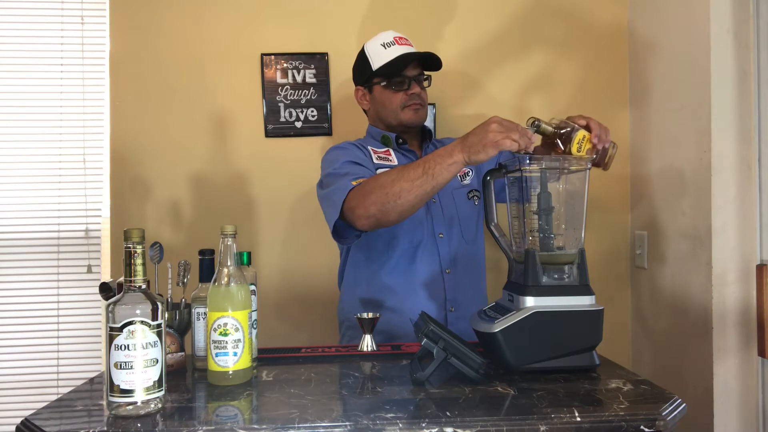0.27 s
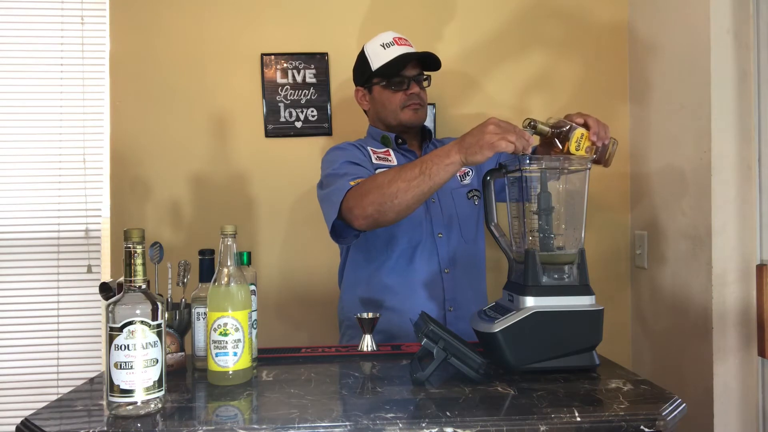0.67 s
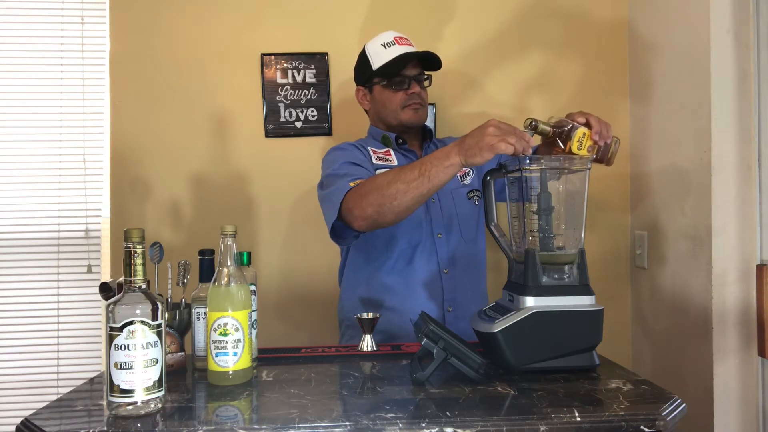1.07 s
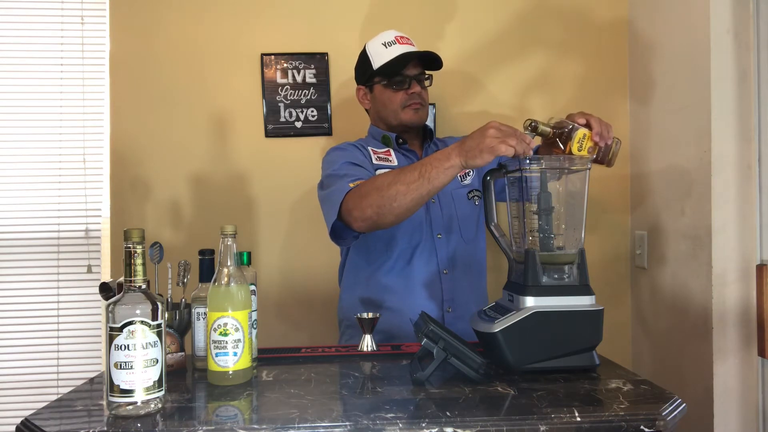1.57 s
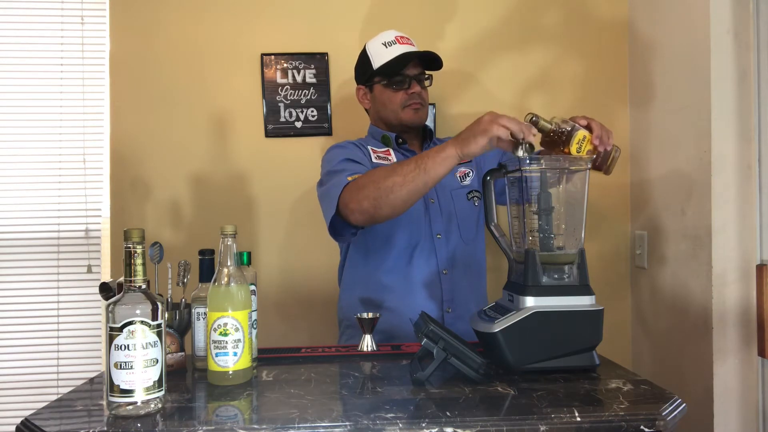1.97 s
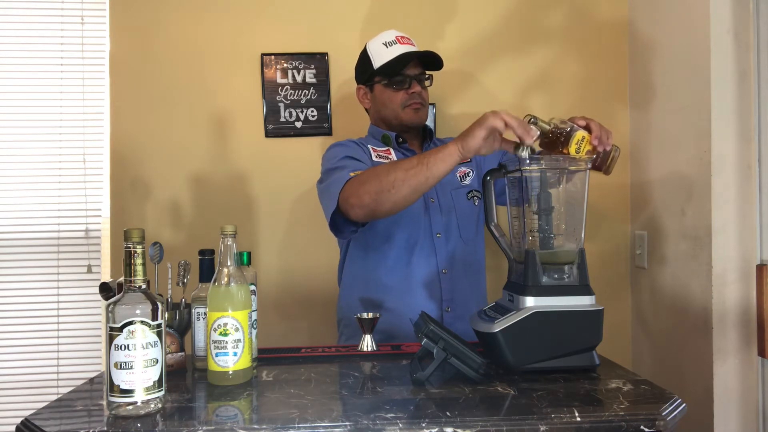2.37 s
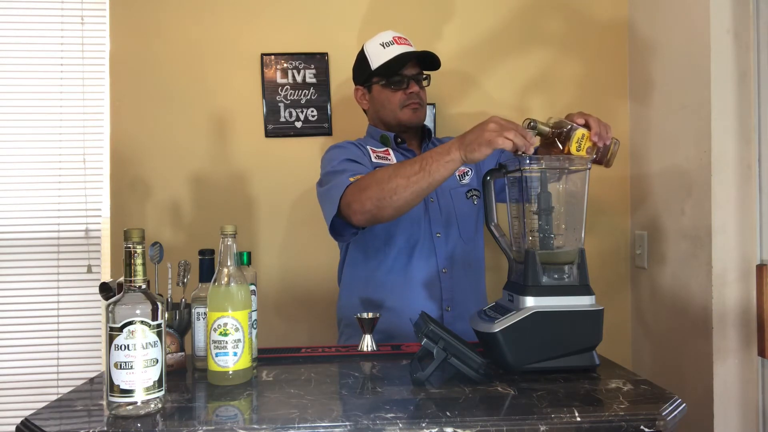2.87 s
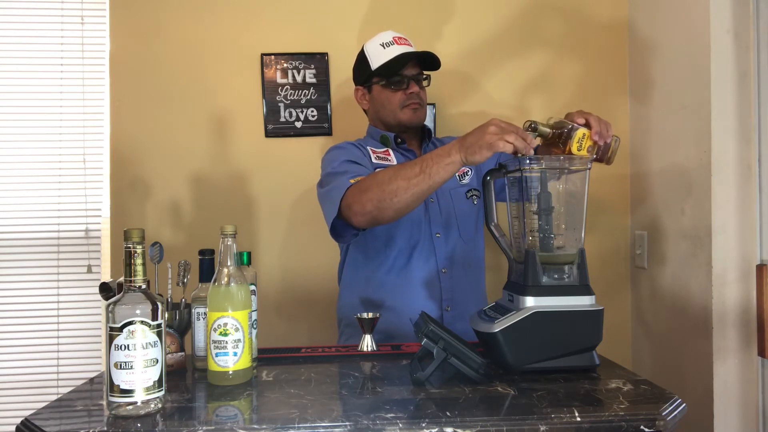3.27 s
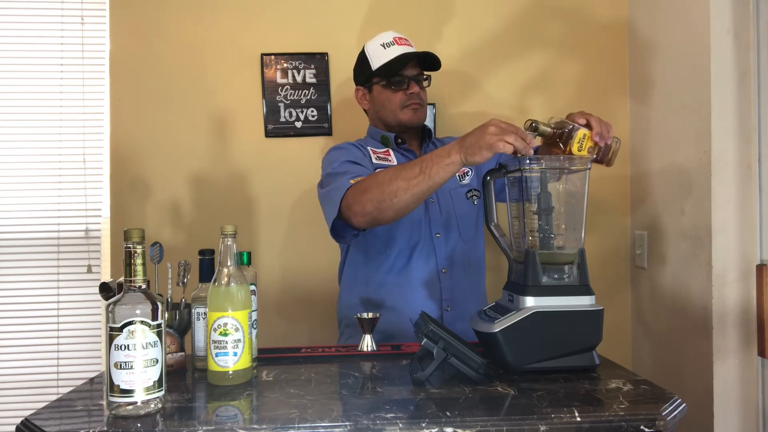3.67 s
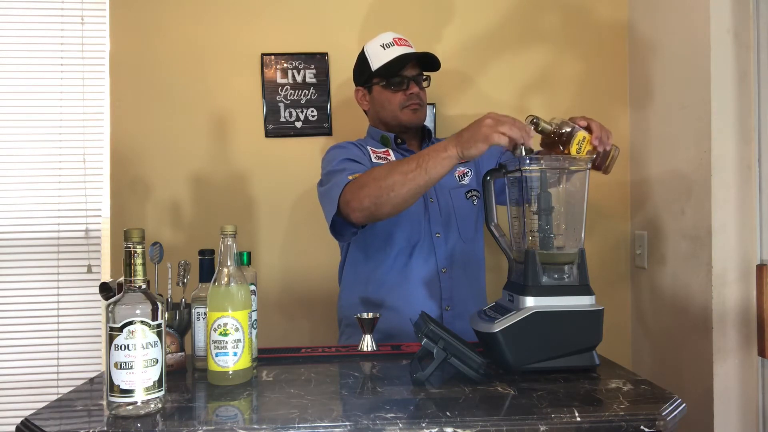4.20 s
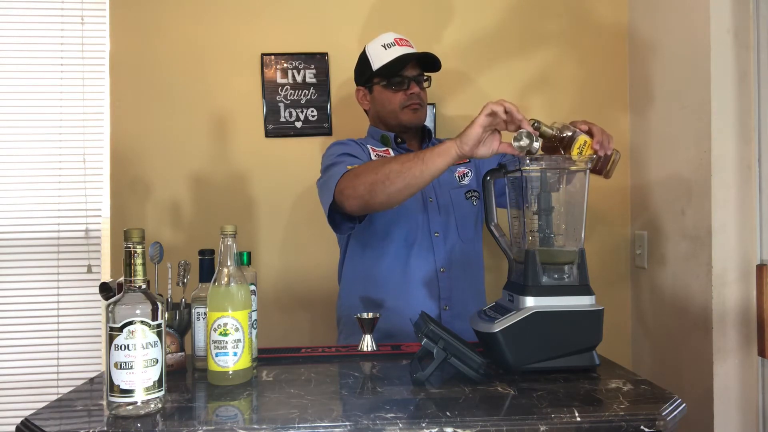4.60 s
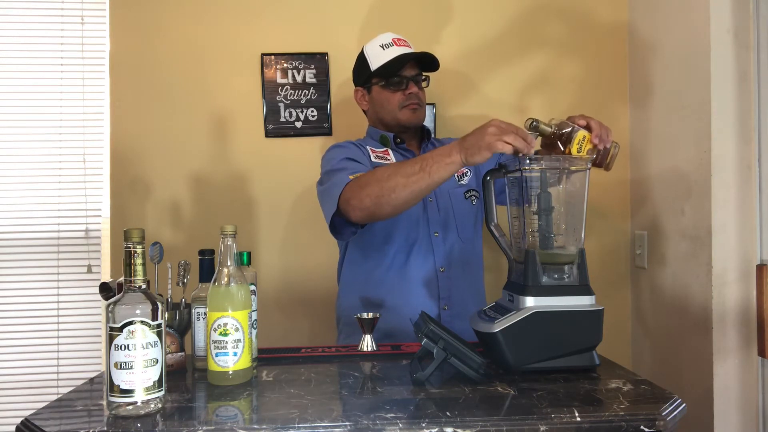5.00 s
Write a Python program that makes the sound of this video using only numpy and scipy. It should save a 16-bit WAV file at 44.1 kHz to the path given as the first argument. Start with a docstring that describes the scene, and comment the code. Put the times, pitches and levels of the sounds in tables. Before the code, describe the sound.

Liquid trickles from a bottle into a small metal measure and is twice tipped splashing into a blender jar, over a low hum.

```python
"""In a small room, over the hum and throb of household machines, spirit trickles from a bottle's spout
into a small metal measure held over a blender jar. Impacts excite the measure's resonances, trapped
bubbles ring and droplets spit. At 2.2 s the measure is tipped: the shot splashes into the jar, churns
up bubbles and sets the air column booming; then the measure knocks. The trickle goes on. At 4.5 s a
knock and a second shot come together, and a last knock follows at 5.1 s."""
import sys
import numpy as np
from scipy import signal
from scipy.fft import rfft, irfft
from scipy.io import wavfile
from scipy.ndimage import uniform_filter1d, map_coordinates

SR = 44100
rng = np.random.default_rng(int(sys.argv[2]) if len(sys.argv) > 2 else 0)


def store_wav(level_fs):
    """Save 16-bit WAV to argv[1]."""
    pcm = np.round(np.clip(np.atleast_2d(level_fs), -1, 1) * 32767)
    wavfile.write(sys.argv[1], SR, pcm.T.astype(np.int16))


N = 231392
T = np.arange(N) / SR

# The tipped shots: start t/s, lead of the first drops/s, emptying time/s, relative splash level/dB,
# sag/(dB/s), boom delay/s, relative boom level/dB, boom f/Hz
SHOTS = [(2.218, .05, 0.35, -45.5, 26, .16, -51, 403.2), (4.484, .008, 0.28, -46, 11.5, .35, -50.5, 427)]


def undb(db):
    """Amplitude ratio for a level in decibels."""
    return 10 ** (np.asarray(db) / 20)


def unit(x):
    """Normalisation to an rms of 1."""
    return x / np.sqrt(np.mean(x ** 2))


def add(out, start_s, sound):
    """Superposition: mix a sound in from the given time."""
    i = max(int(start_s * SR), 0)
    out[i:i + len(sound)] += sound[:max(N - i, 0)]


def walk(rate):
    """Smooth random modulation of spread near 1, changing rate times a second."""
    step = int(SR / rate)
    held = np.repeat(rng.standard_normal(N // step + 1), step)
    return 1.3 * uniform_filter1d(held, step)[:N]


def colour(x, points):
    """Minimum-phase filter through points (f/Hz, gain/dB)."""
    hz, db = np.transpose(points)
    f = np.maximum(np.arange(N + 1) * SR / (2 * N), 1)
    cepstrum = irfft(np.log(undb(np.interp(np.log(f), np.log(hz), db))))
    cepstrum[1:N] *= 2  # folding onto positive time makes the filter causal
    cepstrum[N + 1:] = 0
    return irfft(rfft(x, 2 * N) * np.exp(rfft(cepstrum)))[:N]


def resonance(x, hz, width_hz):
    """Second-order resonator with gain 1 at its centre."""
    quality = hz / min(width_hz, SR / 4)
    return signal.lfilter(*signal.iirpeak(min(hz, SR / 2 - 1), quality, fs=SR), x)


def vessel(x, modes):
    """Forced vibration: the driving sound plus the modes that it excites."""
    return x + sum(undb(db) * resonance(x, hz, width) for hz, width, db in modes)


def machines():
    """Fans and compressor give a wavering line spectrum whose close tones beat, over broadband noise."""
    # Tones of fans and compressor: f/Hz, relative level/dB
    tones = [(18.7, -37.9), (23.3, -40.3), (53.8, -57.4), (58.5, -60.7), (113.9, -67), (119.9, -68),
             (161.5, -72.7), (192.3, -64.8), (227.9, -57.8), (233.8, -68.3), (239.9, -65), (270, -75),
             (292.2, -61.9), (335.7, -74.5), (473.7, -71), (525.9, -72.9), (552.6, -83), (584.3, -81.6)]
    # Spectra of their rumble and of moving air: f/Hz, spectral density level/dB
    rumble_spectrum = [(3, -54), (12, -50.5), (20, -61.5), (30, -66.5), (40, -60.5), (58, -69), (72, -77.5),
                       (88, -99), (150, -125)]
    air_spectrum = [(60, -112), (100, -79.5), (200, -84), (330, -79), (375, -85), (405, -84.5),
                    (470, -85.5), (540, -95), (660, -94), (860, -92), (1250, -98.5), (1600, -104),
                    (4000, -112), (15000, -117)]
    hum = np.zeros(N)
    for hz, db in tones:
        amplitude = np.sqrt(2) * undb(db + .9 * walk(3))
        hum += amplitude * np.sin(2 * np.pi * (hz * T + rng.random()) + .25 * walk(3))
    rumble = colour(rng.standard_normal(N) * np.sqrt(SR / 2), rumble_spectrum)
    air = colour(rng.standard_normal(N) * np.sqrt(SR / 2), air_spectrum)
    return undb(.5) * hum + rumble + air * undb(.5 * walk(5.57))


def stream():
    """Amplitude envelope of the spout's flow: steady, with brief surges, a little louder during shots."""
    # Surges of the stream: t/s, relative level/dB
    surges = [(.02, -56), (.45, -72), (1.0, -61.5), (1.38, -61.5), (1.67, -63.5), (3.97, -71), (4.28, -69),
              (5.19, -63)]
    rise_s, fall_s = .046, .019
    surging = sum(undb(db) * np.exp(-np.maximum((s - T) / rise_s, (T - s) / fall_s)) for s, db in surges)
    tipped = sum((T > s) & (T < s + empty_s + .2) for s, _, empty_s, *_ in SHOTS)
    return undb(-66 + 2.5 * uniform_filter1d(tipped * 1., size=2048)) + surging


def impacts(rate, spread_db, decay_s):
    """Poisson process of droplet impacts, most tiny and a few large, each a decaying puff of noise."""
    chance, size, spray = rng.random(N), rng.exponential(size=N), rng.standard_normal(N)
    hits = (chance < rate / SR) * undb(spread_db * np.minimum(size, 4)) ** 2
    energy = signal.lfilter([1], [1, -np.exp(-2 / (decay_s * SR))], hits + 1e-12)
    return spray * np.sqrt(energy)


def scatter(x, t60, wet_db, size):
    """Diffuse reflection off walls and heaving liquid: each band's energy lingers as decaying noise."""
    frames = dict(nperseg=size, noverlap=size - size // 4)
    sound = signal.stft(x, **frames)[2]
    noise = signal.stft(rng.standard_normal(N), **frames)[2]
    retained = 1e-6 ** (size / 4 / SR / t60)  # share of energy left after each hop
    energy = signal.lfilter([0, 0, 1 - retained], [1, -retained], np.abs(sound) ** 2 + 1e-30)
    echoes = signal.istft(np.sqrt(energy) * noise / np.std(noise), **frames)[1]
    return x + undb(wet_db) * echoes[:N]


def wander(x, depth_db, patch_s, patch_hz):
    """Spectral modulation: the stream strikes ever new spots, so patches of spectrum flare and fade."""
    hz, s, sound = signal.stft(x, SR, nperseg=256)
    place = np.meshgrid(hz / patch_hz, s / patch_s, indexing="ij")
    field = map_coordinates(rng.uniform(-1, 1, (64, 512)), place, order=1)
    return signal.istft(sound * undb(depth_db * field))[1][:N]


def bubble(hz, cycles, rise):
    """Trapped air rings as a damped oscillator whose pitch climbs as it nears the surface."""
    age = np.arange(int(cycles / hz * SR)) * hz / SR / cycles  # 0 to 1 over a decay of 60 dB
    onset = 1 - np.exp(-age * cycles / 1.48)
    phase = 2 * np.pi * cycles * (age + rise * age ** 2 / 2)
    return onset * 1000 ** -age * np.sin(phase)


def froth(flow, low_hz, high_hz, cycles, rise, spread_db, count):
    """Air entrainment: bubbles of random size sum incoherently, as loud as the flow that makes them."""
    out, wet_times = np.zeros(N), T[flow > 1e-6]
    for when, size, life, strength in rng.random((count, 4)):
        ring = bubble(low_hz * (high_hz / low_hz) ** size, cycles * (.5 + life), rise)
        add(out, wet_times[int(when * len(wet_times))], undb(spread_db * strength) * ring)
    return unit(out) * np.sqrt(len(wet_times) / N) * flow


def trickle():
    """Impact excitation: the thin stream patters on the measure, drives its modes and fizzes."""
    # Spectrum of the spray: f/Hz, relative level/dB
    spectrum = [(300, 16.5), (1000, -0.5), (2000, -2), (4000, -4.5), (6000, -2.5), (10000, -4),
                (13000, -5.5), (16000, -42)]
    # Resonances of the measure: f/Hz, bandwidth/Hz, gain/dB
    measure_modes = [(1710, 30, 11), (1748, 87, 13), (2260, 23, -9), (2480, 39, -5), (2656, 90, 10),
                     (2888, 68, 5.5), (3030, 59, -3), (3410, 74, 9.5), (5080, 68, 2), (5760, 720, -14.5)]
    flow = stream()
    patter = scatter(impacts(rate=320, spread_db=5, decay_s=.0018), t60=.059, wet_db=2, size=128)
    patter = wander(patter, depth_db=7, patch_s=.03, patch_hz=1200)
    patter *= undb(2.2 * np.tanh(walk(25)))  # the level flutters
    patter = unit(vessel(colour(patter, spectrum), measure_modes))
    fizz = froth(flow, low_hz=1997, high_hz=13100, cycles=112, rise=.12, spread_db=20, count=1400)
    return undb(1) * flow * patter + undb(-8) * fizz


def drops(start, length_s, per_s, db, spread_db, low_hz, high_hz):
    """Jittered train of up to 64 chance events, as rows (t/s, level/dB, f/Hz)."""
    rows = []
    for k, (when, strength, size) in enumerate(rng.random((64, 3))):
        s = start + (k + when) / per_s
        if s < start + length_s:
            rows.append((s, db + spread_db * (2 * strength - 1), low_hz * (high_hz / low_hz) ** size))
    return rows


def plops():
    """Bubble resonance: the larger bubbles ring one by one, with the jar's short echo."""
    # The loudest single bubbles: t/s, relative level/dB, f/Hz
    loudest = [(.048, -40, 2140), (.171, -49.5, 2600), (.573, -47, 2170), (1.184, -43.5, 1810),
               (1.689, -39.5, 1600), (1.724, -42.5, 2860), (1.761, -41.5, 1880), (2.213, -33.5, 3720),
               (2.218, -36.5, 1206), (2.246, -35, 2340), (2.398, -37, 2320), (2.406, -35, 1094),
               (2.467, -30.5, 4600), (2.487, -34.5, 1113), (2.525, -34.5, 1720), (2.959, -50, 2260),
               (3.314, -46, 2840), (4.345, -47, 770), (4.507, -38.5, 990), (4.589, -33, 1180),
               (4.618, -34, 1200), (4.763, -30, 1190), (4.821, -36, 1110), (4.856, -39, 1040),
               (5.139, -40, 1720)]
    # Lesser ones come by chance: plinks in the measure, deeper glugs in the jar during a shot.
    plinks = drops(0, N / SR, per_s=6, db=-55.5, spread_db=5, low_hz=1530, high_hz=2300)
    glugs = []
    for start, _, empty_s, *_ in SHOTS:
        glugs += drops(start, empty_s, per_s=35, db=-44.5, spread_db=5.5, low_hz=847, high_hz=2100)
    out = np.zeros(N)
    for s, db, hz in list(loudest) + plinks + glugs:
        add(out, s, undb(db) * bubble(hz, cycles=39.7, rise=.14))
    return undb(-1.5) * scatter(out, t60=.054, wet_db=2, size=256)


def spits():
    """Band-limited transients: a droplet bursts with a bright tick and a short shower of finer ones."""
    # The loudest droplets against the walls: t/s, relative level/dB, centre f/Hz
    loudest = [(.2267, -52.5, 9900), (.964, -50.5, 9600), (1.1183, -50, 9700), (1.6222, -53, 9500),
               (1.8423, -54, 8860), (2.1622, -43.5, 10800), (2.2224, -36.5, 4210), (2.265, -36, 7500),
               (2.3156, -38.5, 9500), (2.632, -47, 4460), (2.7955, -48.5, 8800), (3.254, -46, 9450),
               (3.9813, -54.5, 8090), (4.272, -51, 5570), (4.625, -35, 3320), (4.645, -39, 5100),
               (5.201, -48, 4960)]
    faint = drops(0, N / SR, per_s=13, db=-56, spread_db=5, low_hz=6100, high_hz=15100)
    attack_s, tick_s, shower_s = .0015, .0024, .015
    out, t = np.zeros(N), T[:SR // 8]
    shape = (1 - np.exp(-t / attack_s)) * (np.exp(-t / tick_s) + undb(-11) * np.exp(-t / shower_s))
    for s, db, hz in list(loudest) + faint:
        burst = rng.standard_normal(len(t)) * shape
        tick = resonance(resonance(burst, hz, width_hz=4000), hz, width_hz=4000)
        add(out, s, undb(db) * tick / np.abs(tick).max())
    return undb(2.5) * out


def gush(start, lead_s, empty_s, db, sag_db_per_s):
    """Amplitude envelope of a shot: first drops, a sudden landing, a sag while emptying, a dribble."""
    attack_s, dribble_s, drain_db_per_s = .0087, .5, 130.5
    landing, end = start - attack_s, start + empty_s
    lead_db, end_db = db - 8.5, db - sag_db_per_s * empty_s
    times = [landing - lead_s, landing, start, end, end + dribble_s]
    levels = [lead_db, lead_db, db, end_db, end_db - drain_db_per_s * dribble_s]
    return undb(np.interp(T, times, levels, left=-200, right=-200))


def shot(start, lead_s, empty_s, db, sag_db_per_s, boom_delay_s, boom_db, boom_hz):
    """Dense impacts of a tipped shot excite the jar's modes; bubbles churn and the air column booms."""
    # Spectrum of the splash: f/Hz, relative level/dB
    spectrum = [(200, -41), (450, 2.5), (720, 2), (1100, -13.5), (2000, -0.5), (4000, 3.5), (6300, 3),
                (9000, 5.5), (12000, 2), (16000, -6)]
    # Resonances of the jar: f/Hz, bandwidth/Hz, gain/dB
    jar_modes = [(1083, 45, -19), (1210, 68, 19), (1570, 51, -27), (1813, 65, 8.5), (2264, 16, 23),
                 (2544, 42, 5.5), (2620, 47, 0), (3180, 370, -0.5), (4210, 40, 1), (4600, 100, -9),
                 (6000, 68, -21), (8200, 46, -34)]
    flow = gush(start, lead_s, empty_s, db, sag_db_per_s)
    splash = impacts(rate=1500, spread_db=3.5, decay_s=.001)
    splash = wander(splash, depth_db=8.5, patch_s=.026, patch_hz=1700)
    splash = unit(vessel(colour(splash, spectrum), jar_modes))
    churn = froth(flow, low_hz=995, high_hz=10970, cycles=58, rise=.18, spread_db=10, count=500)
    boom = air_column(start + boom_delay_s, boom_hz)
    return undb(-1) * flow * splash + undb(-8) * churn + undb(boom_db - 3.5) * boom


def air_column(peak_s, hz):
    """Cavity resonance: driven at random, the jar's air sounds a narrow band, rising with the liquid."""
    swell_db_per_s, hold_s, fade_db_per_s, rise_hz_per_s = 87, .081, 160, 110
    phase = 2 * np.pi * np.cumsum(hz + rise_hz_per_s * (T - peak_s)) / SR
    band = walk(80) * np.sin(phase) + walk(80) * np.cos(phase)
    before_s = np.maximum(peak_s - hold_s / 2 - T, 0)
    after_s = np.maximum(T - peak_s - hold_s / 2, 0)
    return band * undb(-swell_db_per_s * before_s - fade_db_per_s * after_s)


def knocks():
    """Damped free vibration: the hand-held measure touches spout or rim, cracks softly and rings."""
    # Touches of the measure: t/s, relative level/dB
    touches = [(2.578, -41), (4.482, -30), (5.099, -40)]
    # Its hand-damped modes: f/Hz, relative level/dB, t60/s
    modes = [(2185, -4.5, 0.13), (2387, 17, 0.026), (2590, 3, 0.056), (2750, -7, 0.11), (3000, -1.5, 0.048),
             (4100, -20, 0.054)]
    attack_s, crack_s = .0039, .01
    out, t = np.zeros(N), T[:SR // 4]
    onset = 1 - np.exp(-t / attack_s)
    for s, db in touches:
        ring = np.zeros(len(t))
        for hz, mode_db, t60 in modes:
            phase = 2 * np.pi * hz * t + rng.uniform(0, 2 * np.pi)
            ring += undb(mode_db) * 1000 ** (-t / t60) * np.sin(phase)
        crack = resonance(rng.standard_normal(len(t)), hz=3300, width_hz=11000) * np.exp(-t / crack_s)
        add(out, s, undb(db) * onset * (undb(-6.5) * ring + undb(-3.5) * crack))
    return out


def reflect(x, wet_db, count):
    """Early reflections: delayed copies return from the jar's walls, the counter and the wall behind."""
    out, gain = x.copy(), undb(wet_db) / np.sqrt(count)
    for lag, sign in rng.random((count, 2)):
        add(out, .001 + .022 * lag, gain * np.sign(sign - .5) * x)
    return out


def scene():
    """Superposition: the pouring and its reverberation in the small room add to the machines' drone."""
    background = machines()
    spray = trickle() + sum(shot(*row) for row in SHOTS) + spits()
    near = reflect(spray, wet_db=-4, count=24) + plops() + knocks()
    return (scatter(near, t60=.37, wet_db=-7, size=1024) + background)[None]


def record(dry):
    """Band limiting: a steep elliptic low-pass removes the highest treble."""
    top_hz = 15600
    return signal.sosfilt(signal.ellip(10, .2, 80, top_hz, fs=SR, output="sos"), dry)


dry = scene()
out = record(dry)
store_wav(out)
```